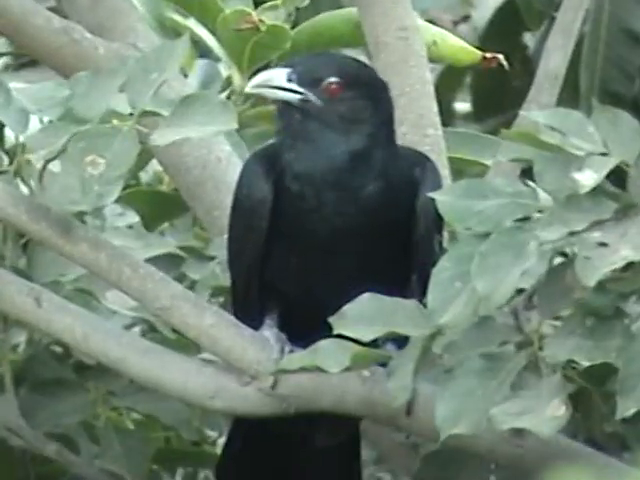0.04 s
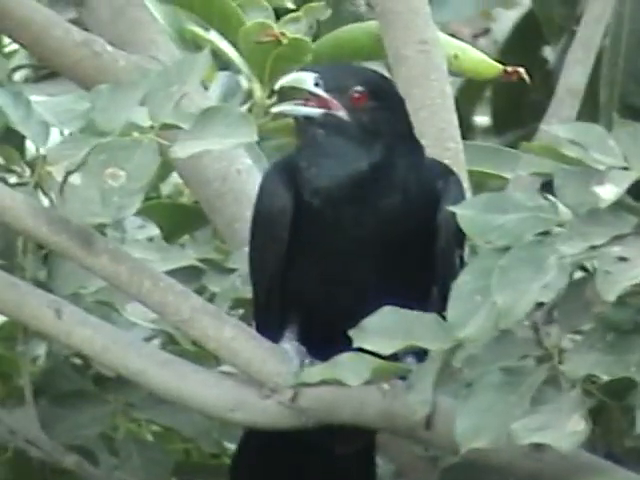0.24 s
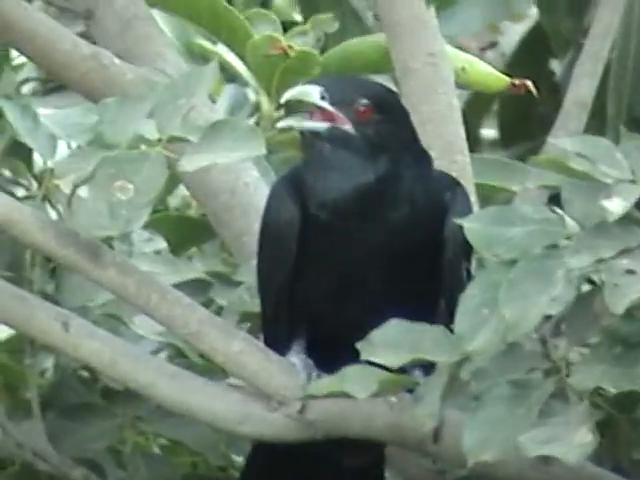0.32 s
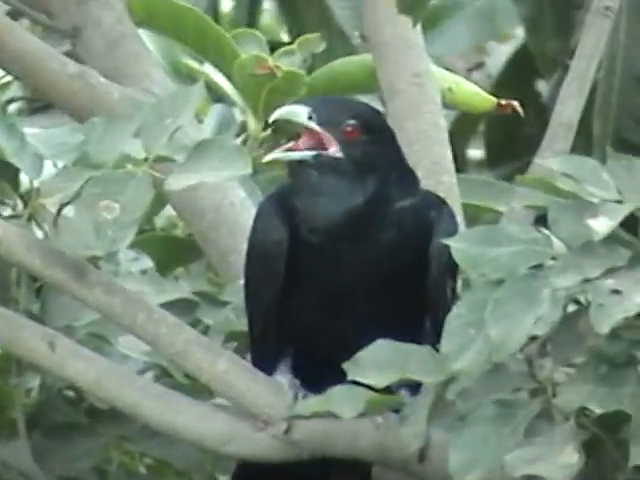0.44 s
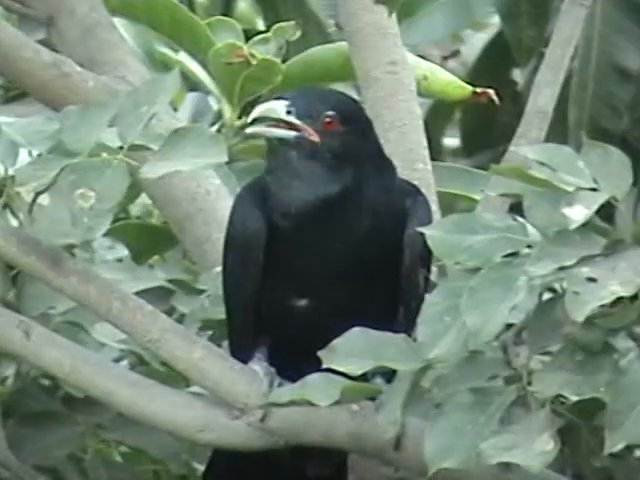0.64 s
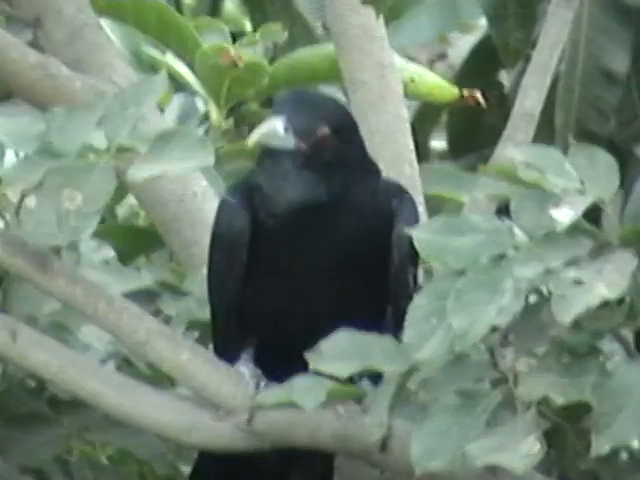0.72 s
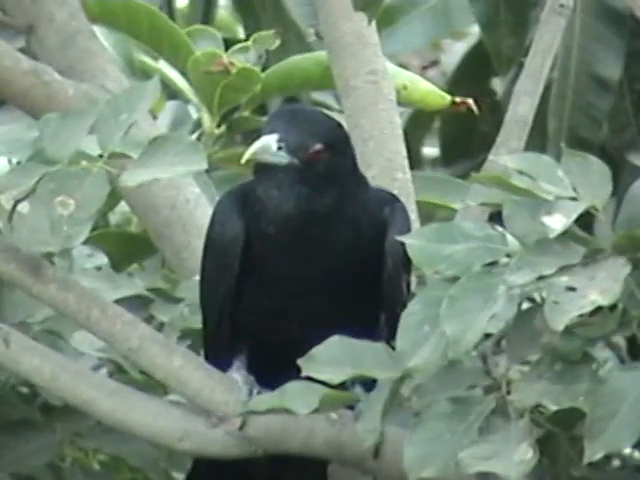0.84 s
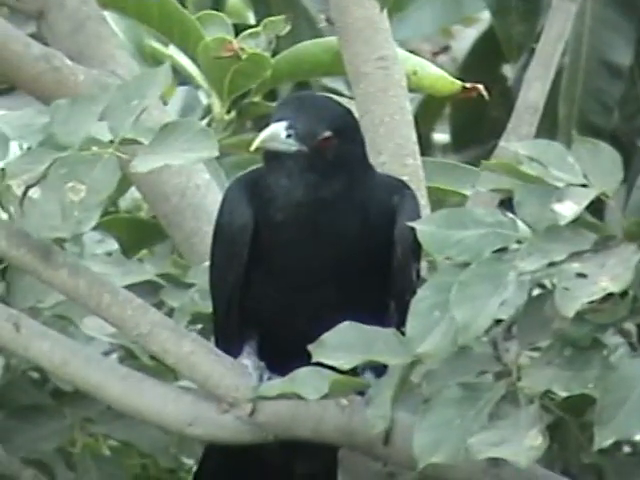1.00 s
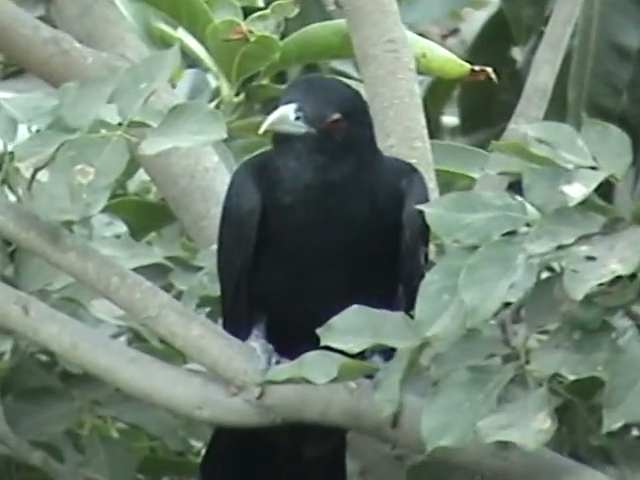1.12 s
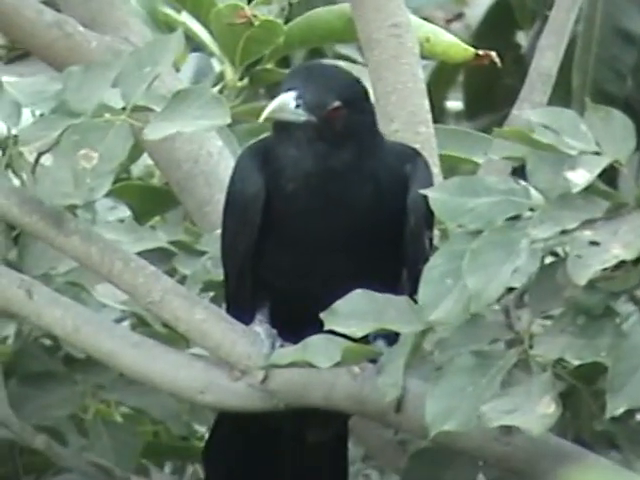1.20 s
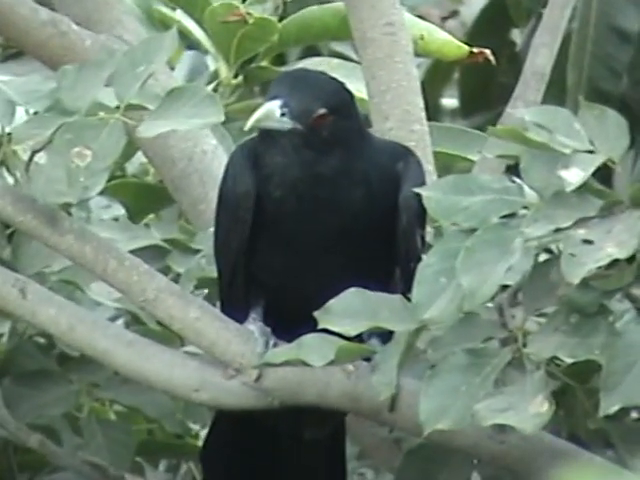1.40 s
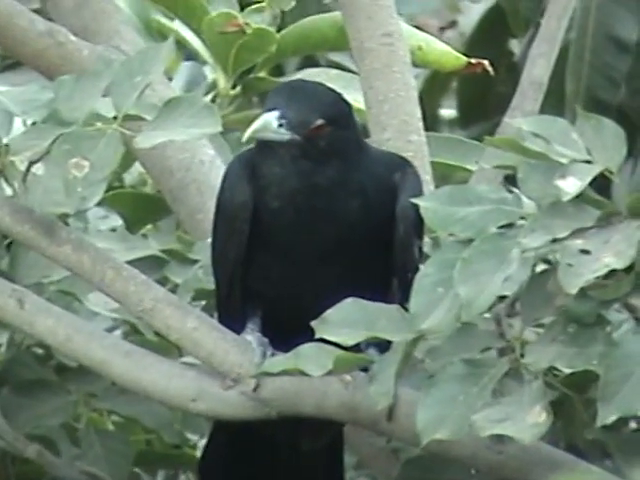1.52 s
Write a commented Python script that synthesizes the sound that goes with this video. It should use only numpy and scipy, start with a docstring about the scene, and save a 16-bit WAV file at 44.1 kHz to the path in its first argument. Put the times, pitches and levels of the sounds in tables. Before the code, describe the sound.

A koel calls once from a garden tree close to the microphone, a loud, clear whistle that rises and slides down with a short echo. Two faint leaf rustles and a soft hiss follow over a steady low outdoor rumble.

```python
"""A koel calls once from a garden tree close to the microphone: a clear whistle from the syrinx that
swells, rises and slides down, with bright overtones from the wide open beak.
Leaves and garden walls scatter the call and leave a short tail. A low, steady outdoor rumble with faint
drones lies underneath. Thin tones sit behind the call and a soft low puff comes as it ends;
then two soft leaf rustles and a faint swell of hiss."""
import sys
import numpy as np
from scipy import signal
from scipy.fft import rfft, irfft
from scipy.io import wavfile
from scipy.ndimage import uniform_filter1d

SR = 44100
rng = np.random.default_rng(int(sys.argv[2]) if len(sys.argv) > 2 else 0)


def generate_wav(sig):
    """Save sig (samples, or channels by samples) to the path in sys.argv[1] as 16-bit PCM at SR."""
    pcm = np.round(np.clip(np.atleast_2d(sig).T, -1, 1) * 32767).astype(np.int16)
    wavfile.write(sys.argv[1], SR, pcm)


N = 68355
T = np.arange(N) / SR
BIN_HZ = np.arange(N // 2 + 1) * SR / N

# How alike the background is at the two microphones. Each row: frequency in Hz, likeness from 0 to 1.
AMBIENT_LIKENESS = [(30, 0.93), (70, 1), (170, 0.99), (400, 0.97), (900, 0.9), (2500, 0.78), (8000, 0.88)]


def koel():
    """Close by, a little right: the syrinx glides, and overtones light up on the throat's resonances."""
    # Each row: time in seconds, pitch of the syrinx in Hz.
    melody = [(.19, 1090), (.203, 1229), (.222, 1346), (.26, 1312), (.3, 1308), (.35, 1328), (.4, 1364),
              (.45, 1435), (.5, 1527), (.54, 1608), (.575, 1664), (.605, 1653), (.63, 1593), (.66, 1445),
              (.7, 1279), (.75, 1100), (.785, 965), (.82, 839)]
    # Each row: time in seconds, whistle level in dB, overtone level in dB before colouring.
    effort = [(.192, -43, -55), (.203, -29, -44), (.22, -25.5, -33.5), (.26, -23, -33), (.33, -22, -29.5),
              (.385, -18.5, -33.5), (.42, -15.5, -29.5), (.47, -17, -26.5), (.535, -10.5, -23.5),
              (.6, -15.5, -22), (.635, -12.5, -23), (.67, -17, -28.5), (.74, -18.5, -40.5),
              (.785, -31, -50), (.815, -31.5, -52)]
    # Strength at the syrinx in dB, one for each overtone from the second harmonic up.
    syrinx_db = [0, 0, -0.5, 0.5, -1, 2.5, -2, 0, 3.5, 4]
    # Resonances of throat and beak. Each row: frequency in Hz, gain in dB.
    throat = [(2000, -6), (2650, -16.5), (3300, -14.5), (3900, -22.5), (4500, -20.5), (4950, -9.5),
              (5300, -24.5), (5850, -4), (6300, -11), (6470, -23), (6700, -7.5), (7200, -7), (7700, -8.5),
              (8150, -1), (8400, -9.5), (8750, -22), (9300, -21), (9650, -30), (9950, -32), (10300, -14),
              (10700, -13.5), (11600, -22), (11850, -32), (12400, -27), (13300, -24), (14000, -37),
              (14450, -25), (15200, -60)]
    # Each row: time in seconds, beak opening (0 is nearly shut, 1 or more is wide open).
    beak = [(.225, 0), (.27, 0.8), (.34, 2)]
    # Colour added while the beak is nearly shut. Each row: frequency in Hz, gain in dB.
    shut_colour = [(2000, 19), (2700, 12.5), (3900, 4.5), (5350, 11), (6000, -6), (6650, -22), (7900, -7.5),
                   (9300, 8.5), (11500, -1), (13300, 2)]
    glide_s, flutter_db, rasp_db = .012, 2.2, -32
    waver = .0012 * drift(per_s=60)
    catch = .039 * swell(.198, .0071) * drift(per_s=430)   # the voice catches roughly at the start
    pitch = uniform_filter1d(in_time(melody)[0], int(glide_s * SR)) * (1 + waver + catch)
    phase = 2 * np.pi * np.cumsum(pitch) / SR
    whistle_db, overtone_db = in_time(effort)
    calling = (T > effort[0][0]) & (T < effort[-1][0])
    gate = uniform_filter1d(1. * calling, SR // 200)
    shut = 1 - np.clip(in_time(beak)[0], 0, 1)
    whistle = from_db(whistle_db) * np.sin(phase)
    overtones = 0
    for k, source_db in enumerate(syrinx_db, 2):
        colour_db = at_hz(throat, k * pitch) + shut * at_hz(shut_colour, k * pitch)
        level_db = overtone_db + source_db + colour_db + flutter_db * drift(per_s=28)
        rasp = 1 + from_db(rasp_db) * drift(per_s=600)
        overtones = overtones + from_db(level_db) * np.sin(k * phase) * rasp
    return np.sqrt(2) * gate * (whistle * pan(left_db=-1.15) + overtones * pan(left_db=-1.2))


def garden_echoes(call):
    """Nearby leaves scatter the call at once; walls farther off add a tail whose treble dies first."""
    # Colour of the scatter from the leaves. Each row: frequency in Hz, gain in dB.
    leaves_colour = [(1000, 0), (1320, -9), (1480, -1), (1700, -1), (5000, -5), (8000, -3), (12000, -2)]
    # Colour of the tail. Each row: frequency in Hz, gain in dB.
    tail_colour = [(700, -14), (1150, 3), (1320, 2.5), (1450, 2), (1680, 4), (2800, 1), (5000, -3),
                   (6500, -6), (10000, -5), (14000, -12)]
    # Each row: frequency in Hz, seconds for the tail to fall 60 dB.
    tail_t60 = [(1000, 1.15), (1700, 1.27), (3000, 1.0), (6000, 0.32), (14000, .25)]
    leaves_db, tail_db = -7.5, -14.5
    white, alike = [(1, 0), (SR, 0)], [(1, .86), (SR, .86)]
    near = rfft(noise(white, alike)) * from_db(leaves_db + at_hz(leaves_colour, BIN_HZ))
    far = rfft(noise(white, alike)) * from_db(tail_db + at_hz(tail_colour, BIN_HZ))
    echoes = irfft(near, N) * echo_decay(delay_s=.0055, t60_s=.14)
    octaves_hz = 500 * 2. ** np.arange(6)
    for low, high in zip(octaves_hz, octaves_hz[1:]):
        centre = np.sqrt(low * high)
        band = irfft(far * ((BIN_HZ >= low) & (BIN_HZ < high)), N)
        echoes = echoes + band * echo_decay(delay_s=.03, t60_s=at_hz(tail_t60, centre))
    return signal.fftconvolve(call, echoes, axes=1)[:, :N]


def rumble():
    """Low, steady outdoor noise all round the microphone."""
    # Each row: frequency in Hz, relative level in dB.
    colour = [(25, -5.5), (45, -3), (70, -1), (150, -2.5), (300, -2), (450, -0.5), (700, -6.5), (1400, -9),
              (2000, -18), (3000, -21), (4200, -27), (6500, -34), (9000, -38.5), (12400, -44), (13500, -65),
              (15000, -85)]
    return from_db(-30.5) * noise(colour, AMBIENT_LIKENESS)


def hiss():
    """A faint midrange hiss, a little to the right, that swells after the call."""
    # Each row: time in seconds, level in dB.
    rise = [(0, -48.5), (.7, -46.5), (1.12, -43.5), (1.22, -38), (1.4, -35), (1.55, -39.5)]
    # Each row: frequency in Hz, relative level in dB.
    colour = [(500, 0), (1000, -9), (1600, 9.5), (2300, 6.5), (3200, -9), (5000, -31), (9000, -38)]
    return from_db(in_time(rise)[0]) * noise(colour, AMBIENT_LIKENESS) * pan(left_db=-2.5)


def puff():
    """A soft low puff of noise as the call ends."""
    # Each row: frequency in Hz, relative level in dB.
    colour = [(100, -26), (300, 1.5), (750, 1), (1300, -18), (5000, -47)]
    return from_db(-30) * swell(middle_s=.732, half_length_s=.022) * noise(colour, AMBIENT_LIKENESS)


def leaf_rustles():
    """Leaves stir twice, each time a brief, soft burst of high noise."""
    # Each row: middle in seconds, peak level in dB.
    rustles = [(1.074, -51), (1.157, -49.5)]
    # Each row: frequency in Hz, relative level in dB.
    colour = [(2000, -22), (4000, 7), (7000, -2), (11000, 0), (13500, -22)]
    envelope = sum(from_db(db) * swell(s, half_length_s=.009) for s, db in rustles)
    return envelope * noise(colour, AMBIENT_LIKENESS)


def drones():
    """Faint low tones that waver inside the rumble."""
    # Each row: frequency in Hz, level in dB.
    tones = [(145, -47), (185, -44.5), (289, -41), (378, -43.5)]
    return sum(from_db(db) * narrow_tone(hz, width_hz=10.2) for hz, db in tones)


def thin_tones():
    """Thin, faint tones that come and go behind the call."""
    # Each row: frequency in Hz, middle in seconds, half length in seconds, peak level in dB.
    tones = [(2458, 0.585, 0.13, -42), (2440, .87, 0.14, -47.5), (3100, 0.778, 0.07, -44.5)]
    return sum(from_db(db) * swell(s, half) * narrow_tone(hz, width_hz=25) for hz, s, half, db in tones)


def from_db(db):
    """Decibels to gain."""
    return 10 ** (np.asarray(db) / 20)


def rms_one(x):
    """Scale to unit power."""
    return x / np.sqrt(np.mean(x ** 2) + 1e-20)


def in_time(rows):
    """Each column of a curve, at every sample."""
    s, *columns = np.transpose(rows)
    return [np.interp(T, s, c) for c in columns]


def at_hz(points, hz):
    """Read a curve on a log-frequency axis."""
    freqs, values = np.transpose(points)
    return np.interp(np.log(np.maximum(hz, 1)), np.log(freqs), values)


def drift(per_s):
    """Slow random motion of spread 1."""
    spectrum = rfft(rng.standard_normal(N))
    return rms_one(irfft(spectrum / (1 + (BIN_HZ / per_s) ** 2), N))


def swell(middle_s, half_length_s):
    """A bell-shaped rise and fall of height 1."""
    return np.exp(-.5 * ((T - middle_s) / half_length_s) ** 2)


def pan(left_db):
    """Left and right gains, moved opposite ways from the centre."""
    return from_db([[left_db], [-left_db]])


def noise(colour, likeness):
    """Stereo noise of a given colour and left-right likeness; rms 1."""
    mid, side = rfft(rng.standard_normal((2, N)))
    alike = np.clip(at_hz(likeness, BIN_HZ), 0, 1)
    both = np.sqrt(1 + alike) * mid + np.sqrt(1 - alike) * side * [[1], [-1]]
    return rms_one(irfft(both * from_db(at_hz(colour, BIN_HZ)), N))


def echo_decay(delay_s, t60_s):
    """Envelope of a cloud of echoes, with unit energy."""
    shape = (T > delay_s) * from_db(-60 * np.maximum(T - delay_s, 0) / t60_s)
    return shape / np.sqrt(np.sum(shape ** 2))


def narrow_tone(hz, width_hz):
    """A wavering tone: noise in a narrow band, rms 1."""
    phase = 2 * np.pi * hz * T
    return drift(width_hz) * np.sin(phase) + drift(width_hz) * np.cos(phase)


def scene():
    """The bird close by, its echoes and the garden around the microphone."""
    call = koel()
    bird = call + garden_echoes(call)
    return bird + rumble() + hiss() + puff() + leaf_rustles() + drones() + thin_tones()


def record(dry):
    """The recorder cuts the top steeply."""
    stop_hz = 15400
    return signal.sosfiltfilt(signal.cheby2(16, 50, stop_hz, fs=SR, output="sos"), dry)


dry = scene()
out = record(dry)
generate_wav(out)
```